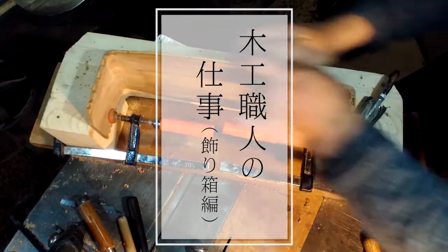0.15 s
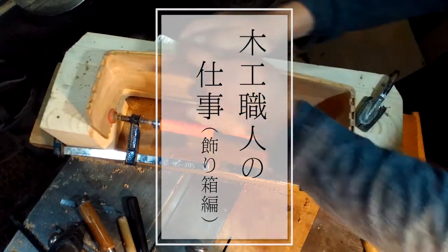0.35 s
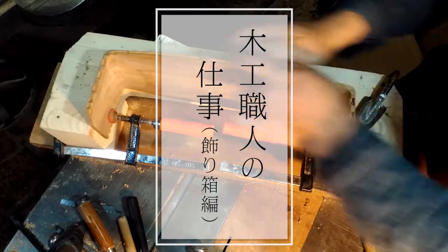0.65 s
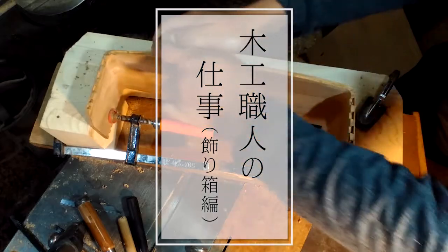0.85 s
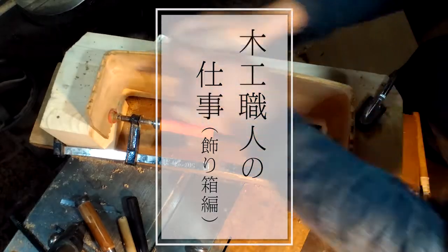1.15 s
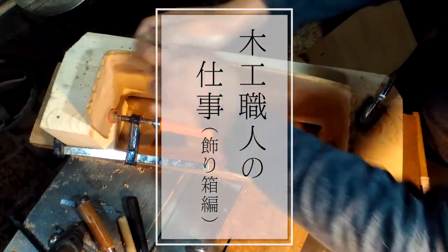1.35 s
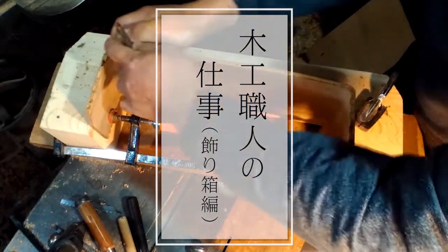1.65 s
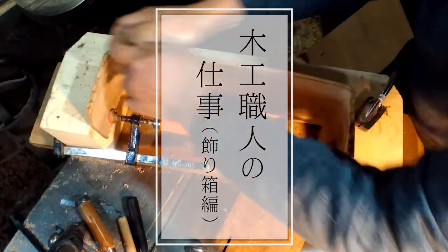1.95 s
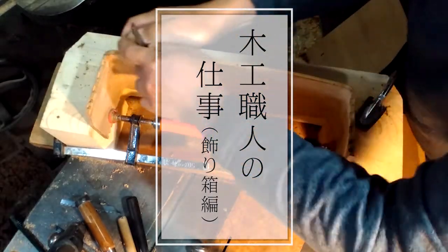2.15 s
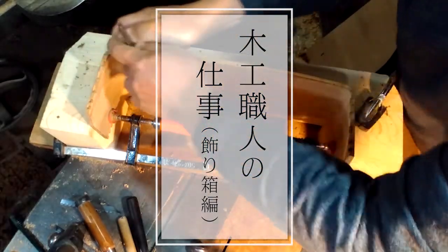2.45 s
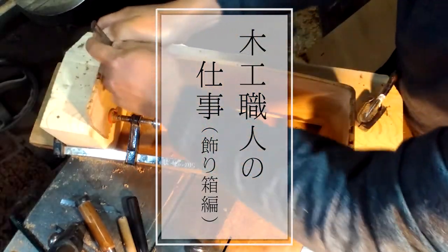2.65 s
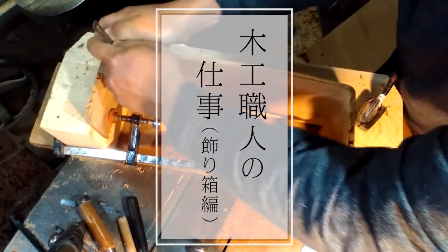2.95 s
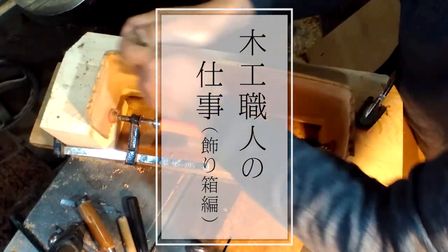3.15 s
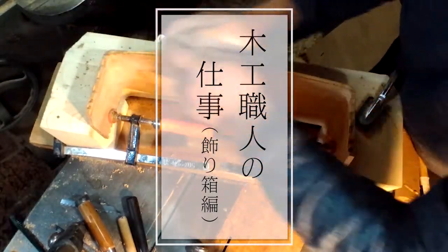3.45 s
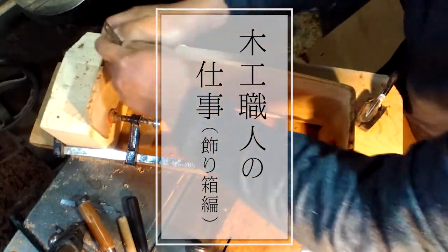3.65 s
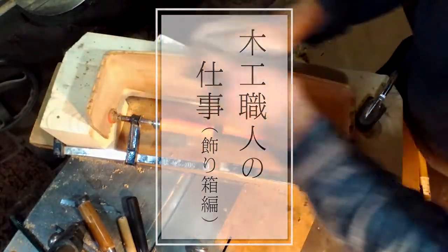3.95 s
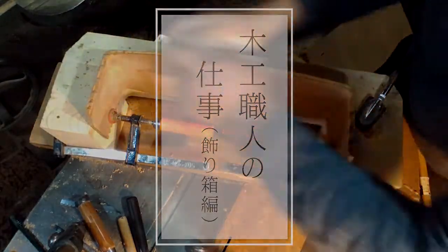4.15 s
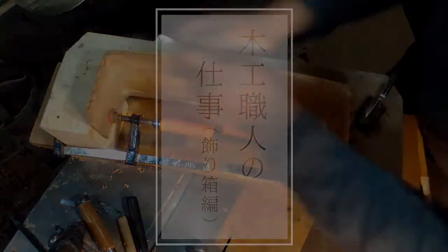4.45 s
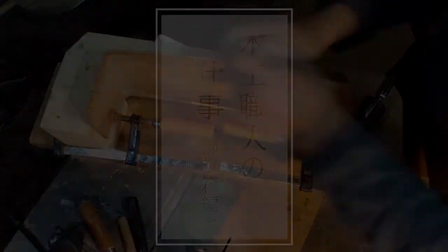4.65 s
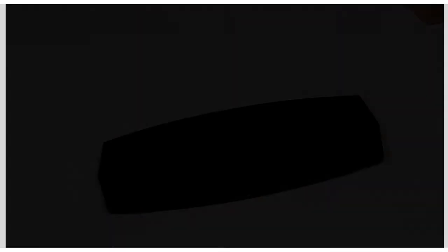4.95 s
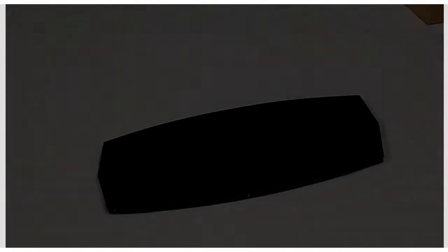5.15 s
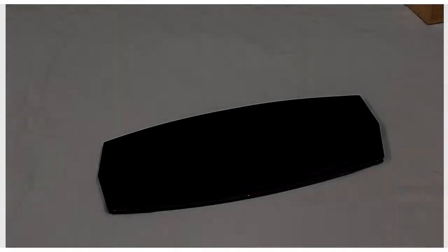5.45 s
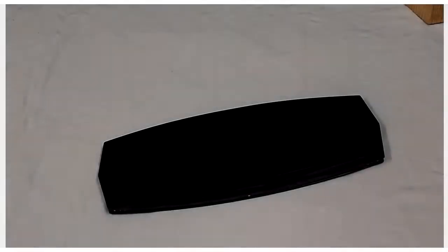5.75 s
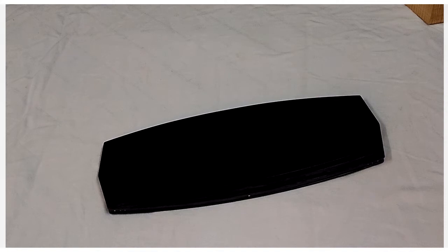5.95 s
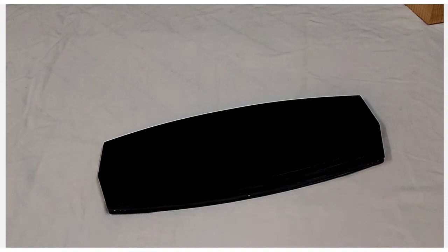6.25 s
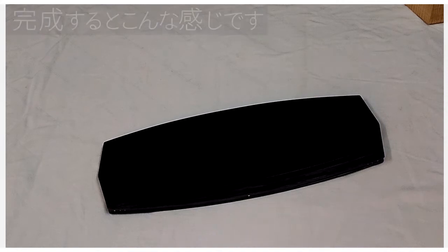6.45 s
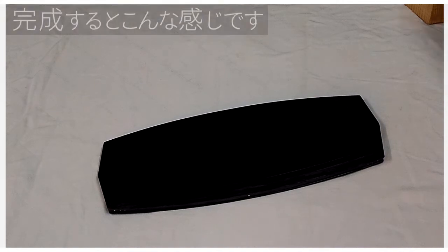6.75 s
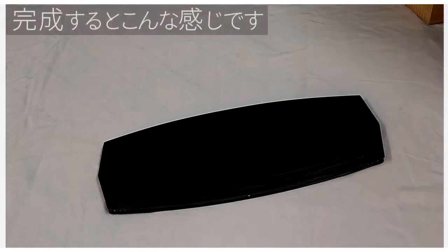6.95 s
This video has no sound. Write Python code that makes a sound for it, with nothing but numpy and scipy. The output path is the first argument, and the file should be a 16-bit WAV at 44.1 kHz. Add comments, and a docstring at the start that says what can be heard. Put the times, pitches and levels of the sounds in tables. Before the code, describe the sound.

Close, dry filing of wood in rapid push-pull strokes, with hard clacks and bench thumps mid-way, gradually fading away into faint room hum.

```python
"""In a workshop, a hand file is worked quickly back and forth over the inner wall of a wooden box on a bench.
Random fibre snaps, filtered by resonances, make each stroke's thrum, scrape and hiss; the bench sways.
Noise bursts make knocks and chatter, sines make squeaks and dull thumps, and scattered echoes the room.
The loudest peaks overload the microphone. The sound of the work is faded out, by falling stroke levels,
and a faint room hum with a low tone comes in at the end."""
import sys
import numpy as np
from scipy import signal
from scipy.fft import rfft, irfft
from scipy.io import wavfile
from scipy.ndimage import uniform_filter1d

SR = 44100
rng = np.random.default_rng(int(sys.argv[2]) if len(sys.argv) > 2 else 0)


def master(y):
    """Save y as 16-bit WAV."""
    cut = np.clip(np.atleast_2d(y).T, -1, 1)
    pcm = np.round(cut * 32767)  # scale
    wavfile.write(sys.argv[1], SR, pcm.astype(np.int16))


N = 313992  # samples

# Strokes of the file, push and pull in turn. Each row: start in seconds, length in seconds, scrape level in dB
# before the trim, share of the length at which the file is fastest, bite (fibre hiss over the scrape) in dB,
# weight (bench thrum over the scrape) in dB, both before the trims.
STROKES = [(-.092, 0.27, -24, 0.27, -2.5, -9.5), (0.151, .34, -25, 0.42, -5, -7),
           (0.473, 0.26, -22, 0.48, -6, -10.5), (0.704, .29, -19, .45, -3.5, -7),
           (.98, 0.2, -15, 0.56, -7, -7.5), (1.151, 0.27, -15.5, 0.58, -5.5, -6),
           (1.435, 0.19, -13.5, 0.37, -12, -8), (1.6, 0.21, -14, 0.39, -8, -4),
           (1.808, 0.19, -12.5, 0.44, -13, -6), (1.952, 0.21, -16.5, 0.49, -6, 0),
           (2.164, 0.17, -17.5, .18, -8, -2), (2.304, .19, -24, 0.35, -6.5, -0.5),
           (2.484, 0.16, -19.5, 0.21, -9, -3.5), (2.592, 0.15, -24.5, 0.61, -18, -1.5),
           (2.771, 0.25, -23, 0.16, -8.5, -0.5), (2.931, .2, -32, 0.36, -14, -1.5),
           (3.146, 0.37, -25.5, 0.47, -18, -9.5), (3.513, 0.27, -28, 0.58, -6.5, -2),
           (3.805, 0.42, -31.5, 0.29, -11, -8), (4.153, 0.27, -35, .55, -5, -3),
           (4.417, 0.32, -34, 0.43, -7.5, -11), (4.696, 0.24, -40.5, 0.45, -1.5, -14.5),
           (4.895, 0.31, -44.5, 0.49, -3.5, -13), (5.168, 0.2, -43.5, 0.53, -7.5, -10.5),
           (5.333, 0.26, -45, 0.54, -5, -13.5), (5.558, 0.17, -46, 0.62, -5, -4.5),
           (5.705, 0.22, -46, 0.62, -8, -8), (5.899, 0.19, -47.5, 0.44, -6, -6),
           (6.05, 0.18, -51, 0.53, -6.5, -14), (6.191, 0.19, -57.5, 0.49, -8, -4),
           (6.348, 0.18, -54.5, 0.57, -10.5, -9.5), (6.508, 0.16, -61.5, 0.3, -5, -6.5)]
# Spectrum of a knock's woody body. Each row: frequency in Hz, relative density in dB per Hz.
CLACK = [(40, -44), (170, -24.5), (330, -6), (500, -6), (800, -9), (1150, -1), (1700, 4), (2100, -8),
         (3100, -8), (4500, -17.5), (8000, -37.5)]
# Spectrum of a knock's hard tick. Each row: frequency in Hz, relative density in dB per Hz.
TICK = [(1500, -25), (3000, -12.5), (5500, 6), (7200, 3), (8200, -11.5), (10500, -16), (12000, -15.5),
        (14000, -15), (16000, -28.5)]
# Resonances of the box and bench, with the microphone's dip near 4 kHz.
# Each row: frequency in Hz, width in Hz, lift in dB (negative for a dip).
RESONANCES = [(524, 52, -0.5), (679.6, 7, 11.5), (806, 30, 6.5), (1075, 25, 6.5), (1276, 38, 4.5),
              (1600, 55, 0.5), (1826, 31, -4.5), (3160, 220, 2), (4060, 52, -7), (4276, 89, 5.5),
              (5650, 220, 1.5), (9830, 200, 5), (11620, 540, 4.5)]
# Modes of the steel file. Each row: frequency in Hz, width in Hz, lift in dB.
FILE_MODES = [(11970, 540, 16), (12900, 250, 4)]
SCRAPE_POWER = 1.66  # exponent on the file's speed


def amp(db):
    """Decibel law: a level in dB becomes an amplitude ratio."""
    return 10 ** (np.asarray(db) / 20)


def evened(x):
    """Normalisation to unit root-mean-square value."""
    return x / np.sqrt(np.mean(x ** 2) + 1e-20)


def read(points, hz):
    """Interpolation along a logarithmic frequency axis."""
    f, value = np.transpose(points)
    return np.interp(np.log(hz + 1), np.log(f + 1), value)


def colour(x, spectrum, peaks=(), size=8192):
    """Minimum-phase filtering: a causal response of unit energy from a spectrum with resonances on top."""
    hz = abs(np.fft.fftfreq(size, 1 / SR))
    lifts = sum(lift / (1 + (2 * (hz - f) / width) ** 2) for f, width, lift in peaks)
    log_gain = np.log(amp(read(spectrum, hz) + lifts))
    # the Hilbert transform of the log gain gives the phase of the causal response
    ring = np.fft.ifft(np.exp(np.conj(signal.hilbert(log_gain)))).real[:size // 2]
    return signal.oaconvolve(x, ring / np.linalg.norm(ring))[:N]


def wander(rate_hz):
    """Low-pass random process: smooth chance of unit size, with little motion above the rate."""
    hz = np.fft.rfftfreq(N, 1 / SR)
    return evened(irfft(rfft(rng.standard_normal(N)) / (1 + (hz / rate_hz) ** 4), N))


def teeth(per_s, spread_db):
    """Random impulse process: fibres snap at chance moments, most of them small, a few large."""
    sizes = amp(spread_db * np.minimum(rng.exponential(1, N), 4)) * rng.choice([-1, 1], N)
    return evened(sizes * (rng.random(N) < per_s / SR))


def effort(power, stroke_db, late=0):
    """Power law of speed: each stroke speeds up from rest and slows again, and force follows a power of speed."""
    usual_stroke_s, cruise = 0.21, 0.47  # strokes longer than usual have a flatter arch
    t, force = np.arange(N) / SR, np.zeros(N)
    for (start, length, _, crest, _, _), db in zip(STROKES, stroke_db):
        during = (t > start) & (t < start + length)
        u = (t[during] - start) / length
        crest = np.clip(crest + late, .05, .95)
        # time is warped so that the half sine peaks at the crest
        warped = u * (1 - crest) / (u * (1 - crest) + crest * (1 - u))
        speed = abs(np.sin(np.pi * warped)) ** ((usual_stroke_s / length) ** cruise)
        force[during] = np.hypot(force[during], amp(db) * speed ** power)
    return force


def travel(x, patch_db, hold_s, width=.012, size=1024):
    """Moving excitation point: as the contact travels, it favours now one group of resonances, now another."""
    hz, t, z = signal.stft(x, SR, nperseg=size, noverlap=size * 3 // 4)
    pitch = np.log(hz + 500) / width
    band = (pitch - pitch[0]).astype(int)  # groups of resonances grow wider towards the treble
    across = signal.windows.gaussian(15, 2)[:, None]
    along = np.exp(-(np.arange(-20, 21) * t[1] / hold_s) ** 2)
    chance = rng.standard_normal((2 * size, len(t)))[:band[-1] + 1]
    favour = evened(signal.fftconvolve(chance, across * along, "same"))  # smooth in pitch and in time
    gain = evened(amp(patch_db * favour[band]))
    return signal.istft(z * gain, SR, nperseg=size, noverlap=size * 3 // 4)[1][:N]


def filing(slip_db=1.59, hiss_slip_db=1.33, rock_db=2):
    """Stick-slip friction: one uneven grip drives the bench thrum, the scrape of the wall and the fibre hiss."""
    # Spectra of the three parts. Each row: frequency in Hz, relative density in dB per Hz.
    thrum_spectrum = [(60, -21.5), (100, -6.5), (145, -1.5), (200, -1), (255, -6), (340, 3.5), (400, -2.5),
                      (490, 6), (600, -14.5), (800, -23), (1200, -50.5)]
    scrape_spectrum = [(300, -47.5), (620, -5), (830, -9), (920, -2.5), (1060, -0.5), (1650, 1.5),
                       (2050, -4), (3200, -6), (3800, -11.5), (5000, -13.5), (9000, -36.5)]
    hiss_spectrum = [(1500, -19), (3200, -3), (4400, -1.5), (5600, 0), (6700, -7.5), (7500, -12.5),
                     (8100, -21.5), (11000, -21), (14000, -23.5), (16000, -35.5)]
    thrum_power, hiss_power = 1.6, 2.48  # the thrum lingers at the turns, the hiss needs speed
    thrum_late = 0.07  # the bench takes up the load later, by this share of the stroke
    _, _, level_db, _, bite_db, weight_db = np.transpose(STROKES)

    grip, snaps = wander(rate_hz=75), teeth(per_s=3800, spread_db=3.0)
    drag = evened(amp(slip_db * grip)) * snaps
    rocking = evened(amp(rock_db * wander(rate_hz=42)))  # the clamped box rocks a little under the hands
    load = drag * rocking * effort(thrum_power, level_db + weight_db, thrum_late)
    thrum = amp(-.5) * colour(load, thrum_spectrum, RESONANCES)
    scrape = amp(0.4) * colour(drag * effort(SCRAPE_POWER, level_db), scrape_spectrum, RESONANCES)
    tearing = evened(amp(hiss_slip_db * grip)) * teeth(per_s=19000, spread_db=2.5)
    hiss = amp(0.82) * colour(tearing * effort(hiss_power, level_db + bite_db), hiss_spectrum, RESONANCES)
    return travel(thrum + scrape + hiss, patch_db=3.0, hold_s=0.022)


def sway(sway_db=-21, average_s=0.54):
    """Inertia as averaging: the heavy bench follows the smoothed effort and rumbles on through the turns."""
    # Spectrum of the bench's rumble. Each row: frequency in Hz, relative density in dB per Hz.
    sway_spectrum = [(20, -11.5), (75, 4), (100, 0.5), (125, 0.5), (220, -34)]
    _, _, level_db, _, bite_db, _ = np.transpose(STROKES)
    push = uniform_filter1d(effort(SCRAPE_POWER, level_db + bite_db / 2), int(average_s * SR))
    return amp(sway_db) * colour(push * rng.standard_normal(N), sway_spectrum)


def workshop(x, first_s=.004):
    """Reverberant decay: scattered reflections from bench and walls, each band dying at its own speed."""
    # Reverberation of the workshop. Each row: frequency in Hz, time to decay by 60 dB in seconds.
    decay_times = [(120, 0.45), (500, 0.2), (1500, 0.18), (7200, 0.16), (10000, 0.14)]
    size = SR // 2
    taps = rng.choice([-1, 1], size) * (rng.random(size) < 4000 / SR) * (np.arange(size) > first_s * SR)
    hz, t, z = signal.stft(taps * 1., SR, nperseg=256)
    decay = amp(-60 * t / read(decay_times, hz)[:, None])
    tail = signal.istft(z * decay, SR, nperseg=256)[1]
    return signal.oaconvolve(x, tail / np.linalg.norm(tail))[:N]


def squeaks(rough=.03):
    """Periodic stick-slip: the teeth skip evenly for a moment and whistle, wavering, at the tooth rate."""
    # Each row: middle in seconds, tooth rate in Hz before the waver, peak level in dB, length in seconds.
    whistles = [(0.052, 6390, -28.5, .04), (0.206, 6620, -32.5, 0.088), (0.868, 5430, -4.5, 0.003),
                (2.522, 6220, -16, 0.029), (2.886, 7110, -11.5, 0.0063), (3.886, 7200, -15, 0.013)]
    t, out = np.arange(N) / SR, np.zeros(N)
    turns = np.cumsum(1 + rough * wander(rate_hz=840)) / SR
    for middle, hz, db, length in whistles:
        fall_db = 17 * np.minimum((2 * (t - middle) / length) ** 2, 20)
        out += amp(db - fall_db) * np.sin(2 * np.pi * hz * turns)
    return out


def thumps(rise_s=.015, waver=0.2):
    """Transient oscillation: the box gives under the hands, swelling quickly and dying at an unsteady pitch."""
    # Each row: start in seconds, pitch in Hz before the waver, level in dB.
    gives = [(.235, 154.3, -34), (.88, 121.6, -25), (1.325, 197.8, -23.5), (1.66, 156, -26),
             (2.07, 205, -21), (2.36, 215, -33), (3.055, 189, -34), (3.165, 175, -30.5),
             (4.305, 207, -41.5), (4.765, 330, -47), (5.95, 330, -52.5), (6.255, 319, -59),
             (6.535, 332, -63)]
    t, out = np.arange(N) / SR, np.zeros(N)
    turns = np.cumsum(1 + waver * wander(rate_hz=110)) / SR
    for start, hz, db in gives:
        u = np.clip((t - start) / rise_s, 0, 20)
        out += amp(db) * u * np.exp(1 - u) * np.sqrt(2) * np.sin(2 * np.pi * hz * turns)
    return out


def blow(contact_s, size=700):
    """Broadband impact: a quick cluster of slips swells and dies, with even energy at all pitches."""
    u = (np.arange(size) + 1) / SR / contact_s
    swell = u ** .4 * np.exp(-u)
    slips = rng.standard_normal(size)
    for _ in range(12):
        slips = irfft(np.exp(1j * np.angle(rfft(slips * swell))), size)  # shape in time, then flatten the spectrum
    return slips / np.linalg.norm(slips)


def knocking(clack_db=8, tick_db=7, clack_s=.0036, tick_s=.003, dig=0.085, lead_s=.0012):
    """Modal excitation by impact: a knock rings the wall, and by its hardness also the steel of the file."""
    # The file lands on the wood or catches hard. Each row: time in seconds, level in dB before the clack and
    # tick gains, hardness (treble over the knock) in dB before those gains.
    landings = [(0.658, 0, -14), (0.748, -8, -8), (0.8644, -8, -1), (1.0223, 9, -11.5),
                (1.4518, 2.5, -13.5), (1.504, -16, -12), (1.5481, 7.5, -15), (1.834, 14, -12.5),
                (1.859, 13, -15.5), (1.893, 12.5, -12.5), (1.9338, 6, -19), (2.0794, 7, -25),
                (2.174, 9, -6), (2.1937, 17, -22), (2.1984, 17.5, -24), (2.2269, 6, -22), (2.258, 4, -16),
                (2.334, -5, -12), (2.4005, 1.5, -14), (2.4914, 5, -13), (2.5039, 6.5, -7),
                (2.5171, 2.5, -2), (2.5393, 6, -11), (2.6344, -6.5, -21), (2.6746, -9, -7.5),
                (2.781, 4.5, -11), (2.795, 4.5, -15), (2.8041, 0.5, -1), (2.822, 2, -8), (2.8285, 1.5, -9),
                (2.8672, -0.5, -12), (2.8846, 5, -7.5), (3.035, -5, -14), (3.157, 0, -24),
                (3.1774, -3.5, -7), (3.1856, 1, -10), (3.221, -9, -23), (3.2398, 4, -15.5),
                (3.2547, 4, -15.5), (3.594, -14, -14), (3.6398, -5.5, -10), (3.8234, -12, -11),
                (3.8624, -2, -9), (3.8762, -1.5, -3), (3.888, 2, -9), (3.9066, -10, -9), (4.3193, -9, -14),
                (4.4478, -13.5, -15), (4.5202, -10, -14), (5.1194, -16, -21), (5.473, -16, -24),
                (5.812, -20, -29)]
    # Modes of the wooden wall. Each row: frequency in Hz, width in Hz, lift in dB.
    wall_modes = [(1216, 39, 10), (1562, 25, 6.5), (1830, 47, 0), (2870, 150, 0.5)]
    soft, hard = np.zeros((2, N))
    for s, db, hardness_db in landings:
        linger = 1 + dig * min(amp(db), 4)  # a heavy blow digs in and rattles for longer
        at = round((s - lead_s) * SR)
        push, tick = blow(clack_s * linger), blow(tick_s * linger)
        soft[at:at + len(push)] += amp(db + clack_db) * push
        hard[at:at + len(tick)] += amp(db + hardness_db + tick_db) * tick
    return colour(soft, CLACK, [*RESONANCES, *wall_modes]) + colour(hard, TICK, [*RESONANCES, *FILE_MODES])


def chatter(body_db=8, edge_db=7, swell=1.0, bounce_s=.0026, count=8):
    """Repeated impact: uneven trains of taps swell and die, dealt among several points of contact."""
    # Spells of bouncing along the wood. Each row: start in seconds, length in seconds, level in dB before the
    # body and edge gains, hardness (treble over the bounce) in dB before those gains.
    spells = [(1.48, .08, -11, -15), (1.869, .085, 4, -19), (2.188, 0.078, -3.5, -6),
              (2.335, 0.081, -10.5, -22), (2.5, 0.083, -7.5, -9), (2.638, 0.063, -11.5, -17),
              (2.77, 0.079, -2.5, -6), (2.975, 0.1, -17, -20), (3.159, 0.053, -2, -12.5),
              (3.242, 0.065, -10, -25), (3.597, .15, -11.5, -19), (3.858, 0.062, -4.5, -11),
              (4.25, 0.16, -22.5, -22), (5.785, 0.058, -32, -25)]
    bounce_per_s, jitter, spread_db = 95, .3, 1  # median tap rate, its log spread, spread of tap levels
    t = np.arange(N) / SR
    body, edge, soft, hard = np.zeros((4, N))
    for start, length, db, hardness_db in spells:
        during = (t > start) & (t < start + length)
        arch = abs(np.sin(np.pi * (t[during] - start) / length)) ** swell
        body[during] = amp(db + body_db) * arch
        edge[during] = amp(db + hardness_db + edge_db) * arch
    turns = np.cumsum(bounce_per_s * np.exp(jitter * wander(rate_hz=70))) / SR
    # one tap at each whole turn
    taps = np.diff(np.floor(turns), prepend=0) * amp(spread_db * np.minimum(wander(rate_hz=90), 1))
    contact = rng.integers(0, count, N)
    for k in range(count):
        soft += signal.oaconvolve(taps * body * (contact == k), blow(bounce_s))[:N]
        hard += signal.oaconvolve(taps * edge * (contact == k), blow(bounce_s))[:N]
    wood = travel(colour(soft, CLACK, RESONANCES), patch_db=3.5, hold_s=0.018, width=0.022, size=512)
    return wood + colour(hard, TICK, [*RESONANCES, *FILE_MODES])


def hum(air_db=-66.5, tone_hz=172, tone_db=-74, from_s=6.665):
    """Stationary background: soft coloured noise with one steady low tone, switched on at the end."""
    # Spectrum of the quiet room. Each row: frequency in Hz, relative density in dB per Hz.
    air_spectrum = [(30, -9.5), (60, -5.5), (100, 0), (250, -5.5), (800, -13), (14000, -21)]
    t = np.arange(N) / SR
    air = amp(air_db) * evened(colour(rng.standard_normal(N), air_spectrum))
    tone = amp(tone_db) * np.sin(2 * np.pi * tone_hz * t)
    return (air + tone) * (t >= from_s)


def scene():
    """Superposition: file, box and bench close by, with the workshop's reflections around them."""
    strokes, knocks, whistles = filing(), knocking() + chatter(), squeaks()
    room = workshop(amp(-9.0) * strokes + amp(-9.0) * knocks + amp(-10.0) * whistles)
    return (strokes + knocks + whistles + room + sway() + hum() + thumps())[None]


def record(dry, edge_hz=14450):
    """Hard clipping and band limit: the loudest peaks overload the microphone, then a low-pass follows."""
    clipped = np.clip(dry, -.92, .92)
    low_pass = signal.firwin(401, edge_hz, window=("kaiser", 8), fs=SR)
    return signal.oaconvolve(clipped, low_pass[None], "same")


dry = scene()
out = record(dry)
master(out)
```